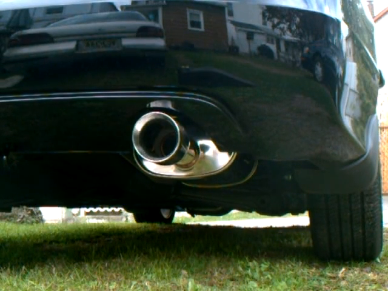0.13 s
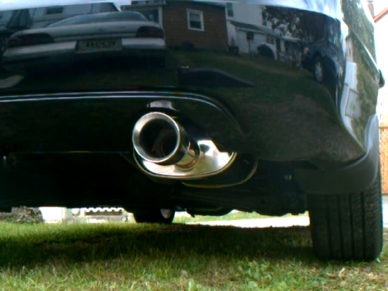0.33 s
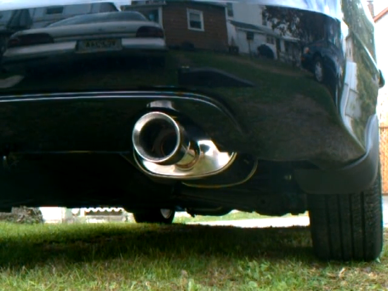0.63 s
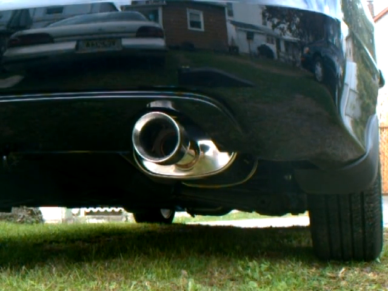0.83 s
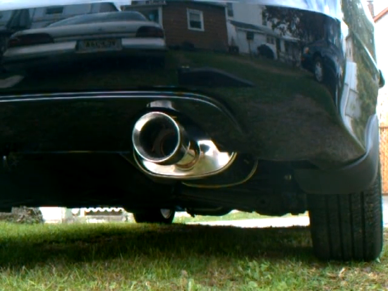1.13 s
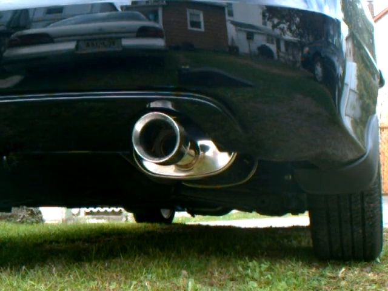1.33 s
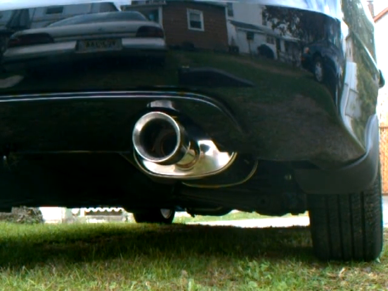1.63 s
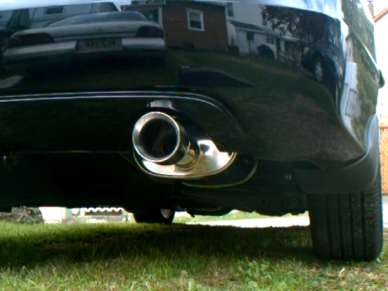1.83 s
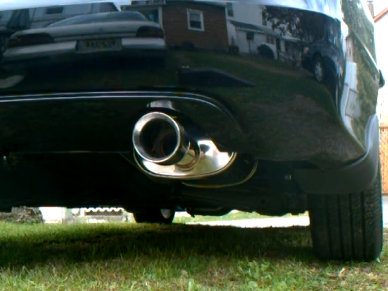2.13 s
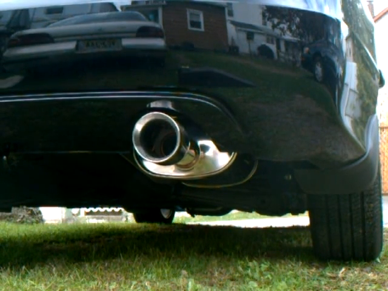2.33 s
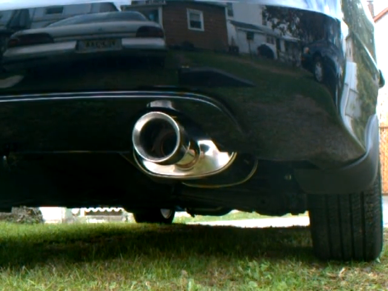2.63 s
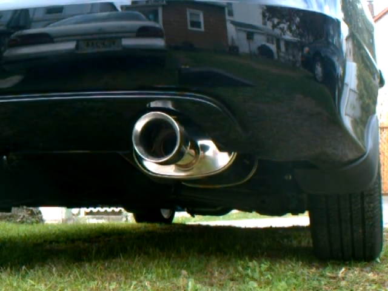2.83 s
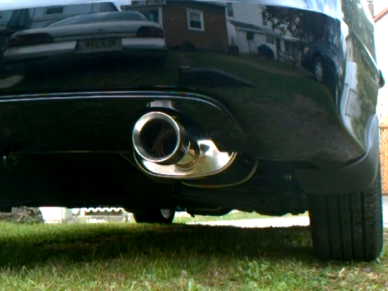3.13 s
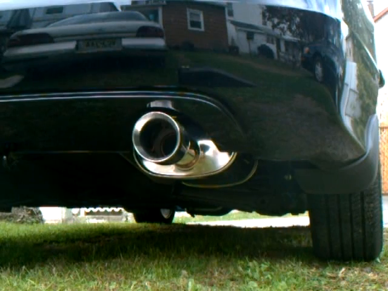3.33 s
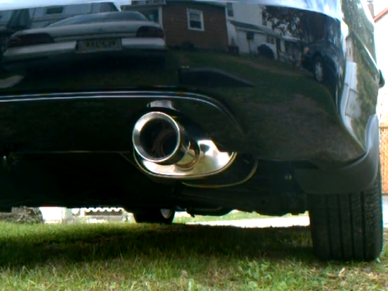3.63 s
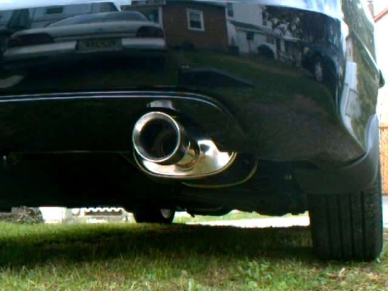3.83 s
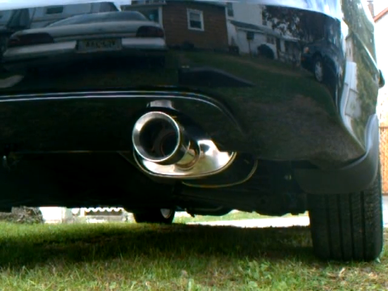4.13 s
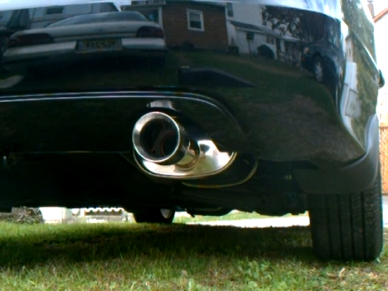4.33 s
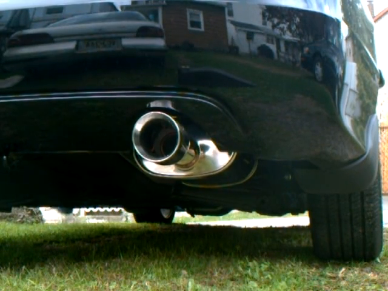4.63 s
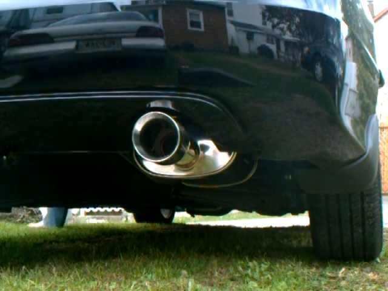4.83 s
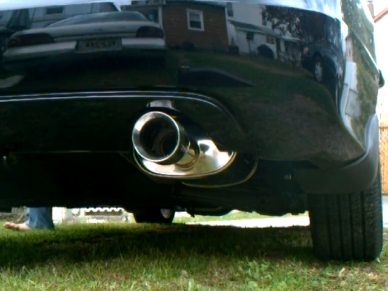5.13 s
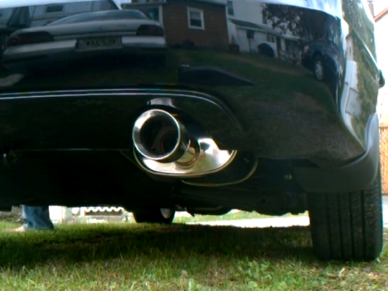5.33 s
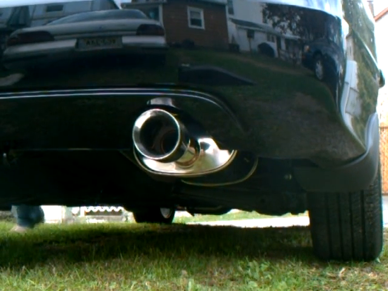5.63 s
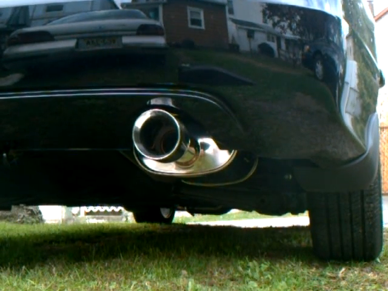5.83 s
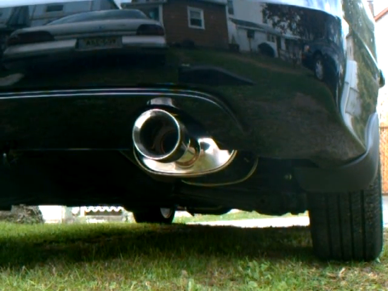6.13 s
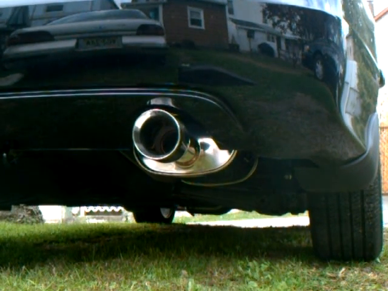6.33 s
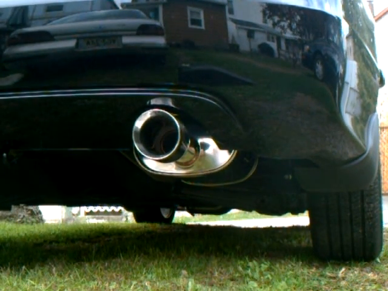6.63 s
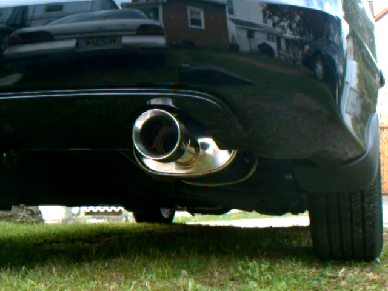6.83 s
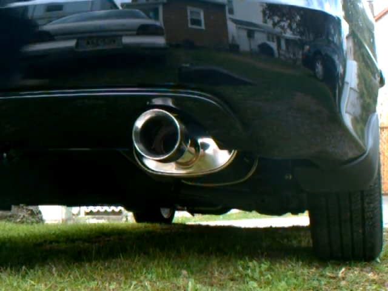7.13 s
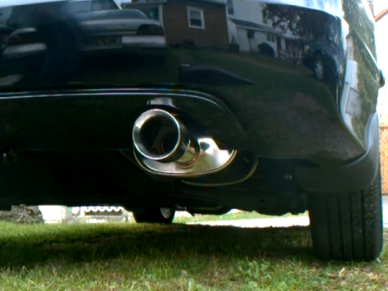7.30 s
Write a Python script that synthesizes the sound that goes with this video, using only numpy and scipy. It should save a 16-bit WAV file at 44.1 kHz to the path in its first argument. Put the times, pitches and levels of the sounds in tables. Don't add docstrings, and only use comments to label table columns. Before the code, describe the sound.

A car exhaust heard very close outdoors on grass. A four-cylinder drone is blipped three times in the first two and a half seconds, each a loud, raspy, clipped bark with low thumps, the third highest. The revs then glide down for almost four seconds, hollow and fading into breathy pulses, and settle into a quiet low idle. Soft footsteps on grass come near the end. The small microphone is dull and overloaded.

```python
import sys
import numpy as np
from scipy import signal
from scipy.fft import rfft, irfft, next_fast_len
from scipy.io import wavfile
from scipy.ndimage import uniform_filter1d

SR = 44100
rng = np.random.default_rng(int(sys.argv[2]) if len(sys.argv) > 2 else 0)


def magnitude_from_level(level_db):
    exponent = np.asarray(level_db, float) / 20
    return 10 ** exponent


def transcribe(u):
    v = np.clip(np.atleast_2d(u).T, -1, 1)
    q = np.round(v * 32767).astype(np.int16)
    wavfile.write(sys.argv[1], SR, q)


N = 329191
FRAME = 64
IDLE_AT_S, IDLE_SETTLE_S, SUCK_SETTLE_S = 6.295, .018, .075


def evened(x):
    return x / np.sqrt(np.mean(abs(x) ** 2) + 1e-20)


def steadied(x):
    return x / np.sqrt(uniform_filter1d(x ** 2, size=3600) + 1e-12)


def summed_db(a_db, b_db):
    return 10 * np.log10(magnitude_from_level(a_db) ** 2 + magnitude_from_level(b_db) ** 2)


def wander(hz, count):
    pole = np.exp(-2 * np.pi * hz * FRAME / SR)
    return evened(signal.lfilter([1], [1, -pole], rng.standard_normal(count)))


def pipe(hz):
    # mode in Hz, width in Hz, level in dB
    modes = [(60.1, 23.9, -13.5), (89.3, 11.5, -11.5), (114, 75, -23), (164, 16, -16.5), (292.3, 73, -5),
             (413, 24, -6), (448.6, 34.4, -3), (530.6, 21, 2), (570.7, 25, 3), (838, 174, 1),
             (990, 40.6, 3), (1083.5, 74, 2.5), (1186.4, 65, 9), (1285, 100, -0.5)]
    response = 0
    for k, (mode_hz, width_hz, db) in enumerate(modes):
        damping = 1j * width_hz * hz
        response = response + (-1) ** k * magnitude_from_level(db) * damping / (mode_hz * mode_hz - hz * hz + damping)
    return response


def noise(spectrum, ring=0.):
    size = next_fast_len(N)
    hz = np.fft.rfftfreq(size, 1 / SR)
    point_hz, point_db = np.transpose(spectrum)
    colour = magnitude_from_level(np.interp(np.log(hz + 1), np.log(point_hz), point_db))
    colour = colour * (abs(pipe(hz)) + .05) ** ring
    return evened(irfft(rfft(rng.standard_normal(N), size) * colour)[:N])


def yard():
    # frequency in Hz, level in dB per Hz
    yard_spectrum = [(70, -25), (120, 0), (300, -3), (440, -3), (1200, -6), (1550, -14), (2200, -14),
                     (3500, -18), (5600, -24)]
    return magnitude_from_level(-49.5) * noise(yard_spectrum)


def steps():
    # start in seconds, peak in dB, centre in Hz, t60 in seconds
    falls = [
        (7.098, -29, 430, .2),
        (7.19, -28, 540, .16),
        (7.424, -32, 290, .16),
    ]
    out, t = np.zeros(N + 4000), np.arange(4000) / SR
    for start_s, db, hz, t60_s in falls:
        b, a = signal.butter(2, [hz * .6, hz * 1.7], "band", fs=SR)
        knock = evened(signal.lfilter(b, a, rng.standard_normal(len(t))))
        out[round(start_s * SR):][:len(t)] += magnitude_from_level(db - 5 - 60 * t / t60_s) * knock
    return out[:N]


def puffs():
    # start in seconds, peak in dB, swing in Hz, t60 in seconds, jet level in dB
    slugs = [
        (.322, 13, 57.4, 0.013, -6),
        (0.744, 1, 48.7, 0.042, -33),
        (0.938, -4, 58.2, 0.15, -19),
        (1.41, 12.5, 56.2, 0.036, 2),
        (1.691, -0.5, 56.5, 0.13, -30.5),
        (2.242, 0, 59, 0.038, -2.5),
        (2.566, -6, 54.8, 0.19, -22),
    ]
    # frequency in Hz, level in dB
    jet_spectrum = [(100, 0.5), (400, 13), (900, 0.5), (1500, -12.5), (2500, -1.5), (4000, -14),
                    (6000, -25.5)]
    out, t, jet = np.zeros(N), np.arange(8000) / SR, noise(jet_spectrum)
    for start_s, db, hz, t60_s, jet_db in slugs:
        start = round(start_s * SR)
        part = slice(start, start + len(t))
        out[part] += magnitude_from_level(db - 60 * t / t60_s) * np.sin(2 * np.pi * hz * t)
        out[part] += magnitude_from_level(jet_db) * jet[part] * np.exp(-(t / .019) ** 4)
    return out


def firing_hz(t):
    # time in seconds, firings per second
    speed = [(0, 100.6), (.32, 83.8), (.63, 154.5), (.73, 171.5), (1.4, 133.6), (1.52, 158), (1.675, 197),
             (2.24, 162.5), (2.565, 228), (3.1, 189.5), (3.6, 158), (4.26, 122), (4.99, 88.2), (5.7, 58),
             (6.3, 33.2), (6.7, 25.2), (6.95, 23.1), (7.46, 23)]
    at_s, hz = np.transpose(speed)
    return np.interp(t, at_s, hz)


def pedal(t, on, off):
    blips = [
        (.315, .31, .69, .71),
        (1.365, 1.39, 1.74, 1.7),
        (2.205, 2.23, 2.46, 2.57),
    ]
    open_s, shut_s = .02, .05
    share = 0
    for row in blips:
        ramp = np.minimum((t - row[on]) / open_s, 1 - (t - row[off]) / shut_s)
        share = share + np.clip(ramp, 0, 1)
    return share


def state(t):
    hz = firing_hz(t)
    idle = 1 - np.exp(-np.maximum(t - IDLE_AT_S, 0) / IDLE_SETTLE_S)
    return hz, np.log2(hz / 100), pedal(t, 1, 3), idle


def lingering(idle):
    return (1 - idle) ** (IDLE_SETTLE_S / SUCK_SETTLE_S)


def flow_db(t):
    hz, octave, throttle, idle = state(t)
    roar_db = summed_db(-28 + 13 * octave + 1.5 * throttle, -34.5 - 11 * idle)
    slowness = np.clip((72.3 - hz) / 10.7, 1e-3, 1)
    suck_db = -34.5 - 16.5 * (1 - lingering(idle)) + 20 * np.log10(slowness)
    lead_s, lead_db = .048, 5
    lead = np.clip(state(t + lead_s)[2] - throttle, 0, 1)
    hiss_db = summed_db(-38 + 11.5 * octave + 4.5 * throttle + lead_db * lead, suck_db)
    return suck_db, roar_db, hiss_db


def gas(turns, pressure):
    # frequency in Hz, level in dB
    roar_spectrum = [(30, -29.5), (100, -30), (250, -13.5), (500, -9.5), (800, -12.5), (1200, -9.5),
                     (1400, -8), (1700, -6), (2100, -7), (6000, -37)]
    loaded_spectrum = [(20, 8.5), (60, -8.5), (150, 6), (300, 0.5), (600, 1), (900, -11), (1500, -26),
                       (2500, -18.5)]
    hiss_spectrum = [(900, -34), (1650, -17), (2000, -5), (2300, 0), (2700, -2), (3130, -1), (3900, -5),
                     (4600, -8), (5200, -7), (6000, -15)]
    draught_spectrum = [(150, -31.5), (260, -4), (550, 1), (700, -11.5), (1000, -36)]
    t = np.arange(N) / SR
    suck_db, roar_db, hiss_db = flow_db(t)
    hz, octave, throttle, idle = state(t)
    firing = (turns + .5).astype(int)
    strength = magnitude_from_level(0.5 * rng.standard_normal(int(turns[-1]) + 2))[firing]
    swing = steadied(uniform_filter1d(pressure, size=60))
    flow = np.where(swing > 0, .5 * swing, -1.4 * swing) ** 1.15 + .05 + (hz / 105) ** 2
    pulsing = 1 + .2 * np.cos(2 * np.pi * (turns - .8))
    roar = magnitude_from_level(roar_db - 3) * evened(pulsing * strength * noise(roar_spectrum, ring=.6))
    load = throttle + .16 * (1 - idle)
    loaded = magnitude_from_level(-21.5 + 8.5 * octave) * load * noise(loaded_spectrum, ring=.13)
    hiss = magnitude_from_level(hiss_db) * steadied(flow * strength) * noise(hiss_spectrum)
    draught = magnitude_from_level(suck_db - 1 - 2.6 * idle) * noise(draught_spectrum, ring=.7)
    return roar + loaded + hiss + draught


def order_levels(t):
    # order of the firing rate, level in dB at 100 firings per s, dB per octave of speed,
    # dB added by full throttle, dB added at idle
    order_table = [(0.5, -19.5, 13, 1.2, 5), (1.0, 4.5, -1.04, 0.5, -10.5), (1.5, -27, 7, 7, 0),
                   (2.0, -12, -3, 6, -10), (2.5, -24, 1.5, 0.5, -13.5), (3.0, -21.5, -5.5, 12.5, -11.5),
                   (3.5, -29.5, -2.5, 4, -13), (4.0, -24.5, -2.5, 3.5, -5), (5.0, -35.5, -11.5, 9, -27),
                   (6.0, -37, -5, 11.5, -14.5)]
    hz, octave, throttle, idle = state(t)
    own_db = {}
    for k, db, speed_db, load_db, idle_db in order_table:
        own_db[k] = db + speed_db * octave + load_db * throttle + idle_db * idle
    punch_db = 6 * (2 * pedal(t, 0, 2) - throttle)
    own_db[1] = own_db[1] + punch_db + 5 * lingering(idle) * idle
    return own_db


def orders(turns):
    # side chamber band in Hz, width in Hz, level in dB (swallowed on overrun)
    traps = [
        (166, 10, -7.5),
        (363, 25, -9.5),
        (667, 30, -5),
    ]
    at = np.arange(0, N + FRAME, FRAME)
    hz, octave, throttle, idle = state(at / SR)
    roar_db = flow_db(at / SR)[1]
    own_db = order_levels(at / SR)
    heat_s = .14
    keep = np.exp(-FRAME / SR / heat_s)
    heat = signal.lfilter([1 - keep], [1, -keep], throttle)
    out = np.zeros(N)
    for k in np.r_[np.arange(1, 25) / 4, np.arange(13, 37) / 2]:
        whole, half = k % 1 == 0, k % .5 == 0
        order_hz = k * hz
        last = min(k, 6 if whole else 3.5)
        if half:
            low_db = own_db[last] - 4.5 * (k - last) - 5 * octave * (k > last)
        else:
            low_db = -60.5 + 19 * throttle + 6 * octave
        low_db = low_db + 3.5 * (heat - .3) * (not whole)
        if whole:
            kind_db = 0
        elif half:
            kind_db = -8 + 3 * throttle
        else:
            kind_db = -29 + 19 * throttle
        high = np.clip((order_hz - 640) / 120, 0, 1)
        upper_db = roar_db - 12.5 + kind_db - .31 * max(k - 6, 0)
        hot = 1 + .055 * throttle
        size = magnitude_from_level((1 - high) * low_db + high * upper_db) * pipe(order_hz / hot)
        sharp = .44 * (k > 1.5) * (1 - throttle) * (1 - high) * (order_hz > 190)
        size = size * (1.6 * abs(pipe(order_hz))) ** sharp
        trap_db = sum(db * np.exp(-((order_hz - f) / w) ** 2) for f, w, db in traps)
        size = size * magnitude_from_level(trap_db * (k > 1.5) * (1 - throttle))
        through = magnitude_from_level(low_db - 11 + 11 * np.log2(order_hz / 300)) * (1 - high)
        size = size * np.sqrt(1 + throttle * (through / abs(size)) ** 2)
        size = size * magnitude_from_level(1.2 * min(k - 1, 1) * wander(2.5, len(at)))
        if k <= 4:
            size = abs(size) * np.exp(.19j * (k * k - 1))
        else:
            size = size * np.exp(2j * np.pi * rng.random())
        rough = np.clip((.02 + .02 * throttle) * k, 0, .25) + .12 * high
        smear = (wander(3.0, len(at)) + 1j * wander(9.6, len(at))) / np.sqrt(2)
        size = size * (np.sqrt(1 - rough ** 2) + rough * smear)
        carrier = np.exp(2j * np.pi * k * turns)
        out += np.sqrt(2) * (np.interp(np.arange(N), at, size) * carrier).real
    return out


def scene():
    turns = np.cumsum(firing_hz(np.arange(N) / SR)) / SR + .6
    pressure = orders(turns)
    return (yard() + steps() + puffs() + gas(turns, pressure) + pressure)[None]


def low_pass(x):
    return signal.sosfilt(signal.butter(12, 15870, fs=SR, output="sos"), x)


def record(dry):
    # camera electronics tone in Hz, level in dB rms
    whine = [
        (2001, -56.5),
        (4000, -56),
    ]
    t = np.arange(N) / SR
    x = dry + sum(np.sqrt(2) * magnitude_from_level(db) * np.sin(2 * np.pi * hz * t) for hz, db in whine)
    x = np.clip(x, -.75, .75)
    band_limit = signal.firwin(201, 5750, window=("kaiser", 10), fs=SR)
    x = signal.oaconvolve(x, band_limit[None], "same")
    return low_pass(np.clip(x, -.715, .715))


dry = scene()
out = record(dry)
transcribe(out)
```